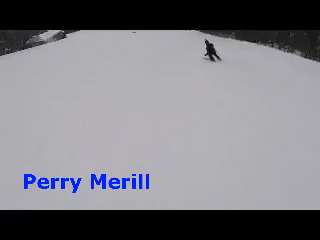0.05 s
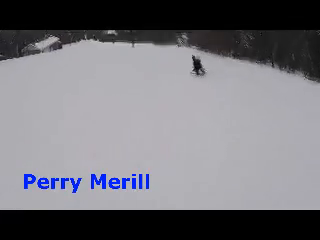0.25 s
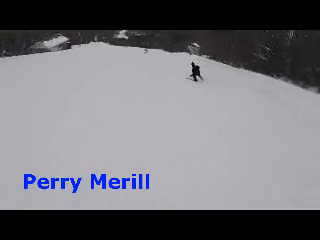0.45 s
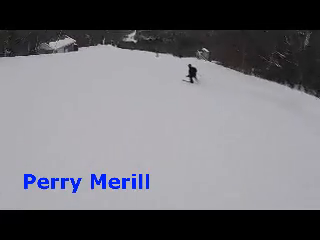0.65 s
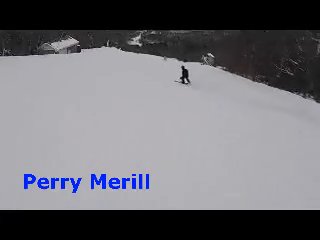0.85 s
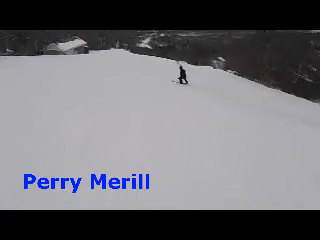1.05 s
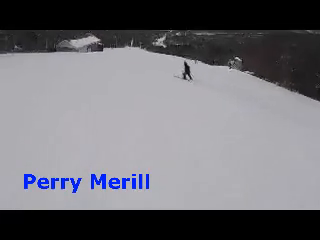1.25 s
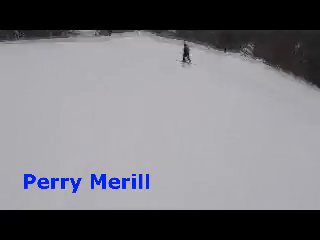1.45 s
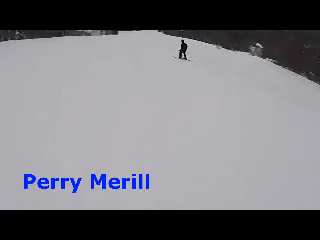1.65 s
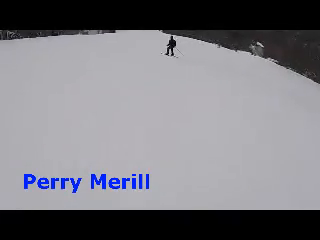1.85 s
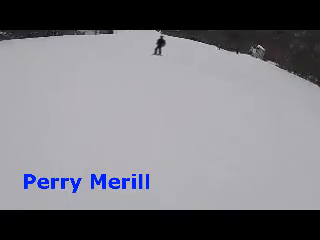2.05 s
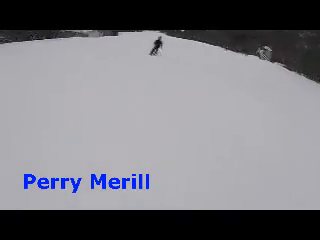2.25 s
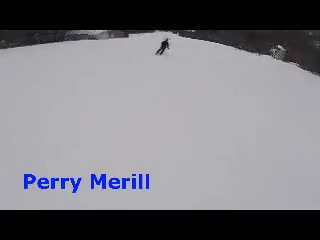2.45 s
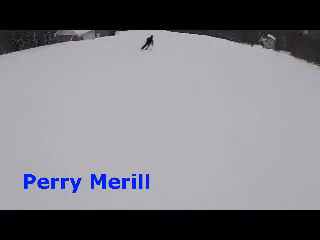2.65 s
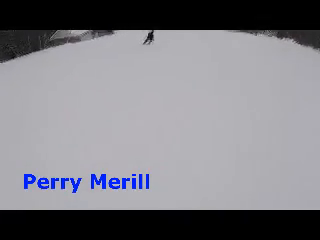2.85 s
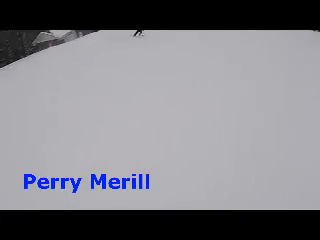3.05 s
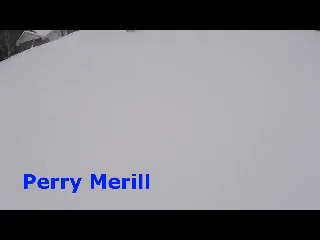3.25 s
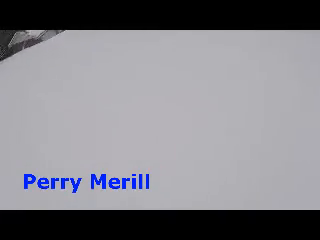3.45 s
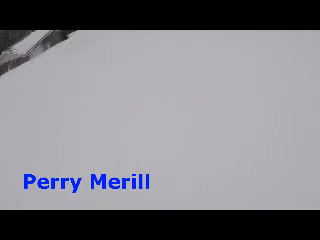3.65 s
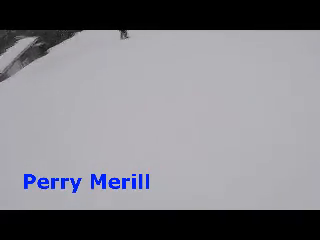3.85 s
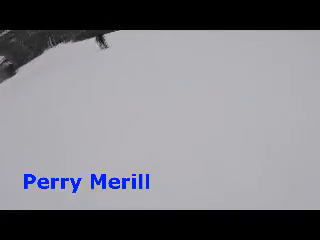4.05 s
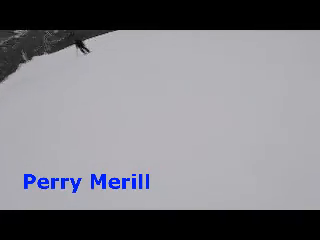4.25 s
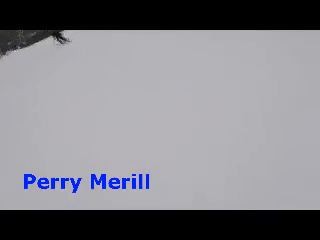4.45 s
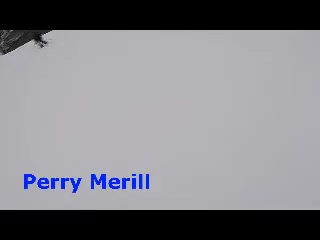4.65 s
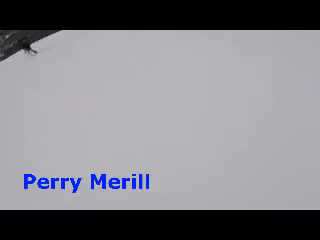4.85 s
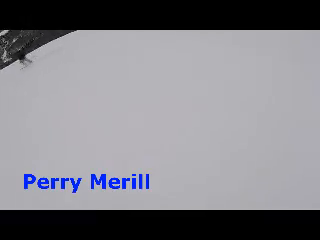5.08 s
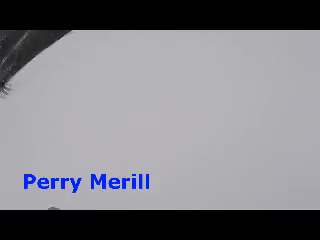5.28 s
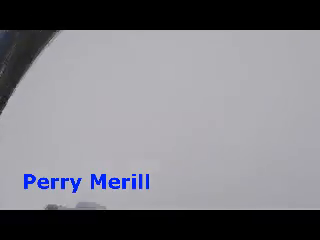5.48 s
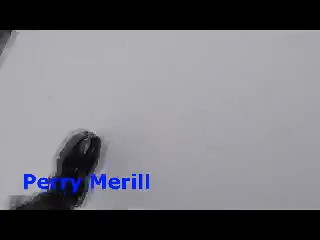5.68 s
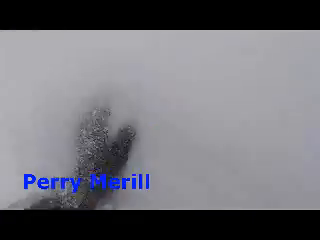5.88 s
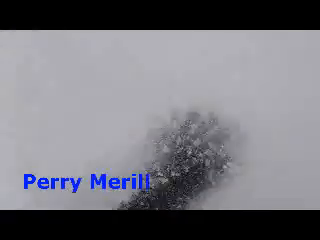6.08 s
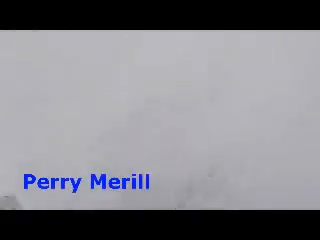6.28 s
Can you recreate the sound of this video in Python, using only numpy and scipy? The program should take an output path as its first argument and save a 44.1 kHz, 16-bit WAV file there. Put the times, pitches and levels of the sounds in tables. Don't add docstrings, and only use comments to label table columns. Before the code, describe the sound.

A skier glides on open snow, very close and muffled, mono. Deep wind buffeting dominates over a quiet hiss of ski bases and sparse knocks. Midway the scraping gets coarser and louder, with a dull thud and two harsh grinding skids. Then lumps of ice clatter hollowly against the housing, with gritty spray and deep thumps, harshly distorted before thinning out.

```python
import sys
import numpy as np
from scipy import signal
from scipy.io import wavfile
from scipy.ndimage import uniform_filter1d

SR = 44100
rng = np.random.default_rng(int(sys.argv[2]) if len(sys.argv) > 2 else 0)


def dump_mix(stems):
    frames = np.atleast_2d(stems).T
    limited = np.clip(frames, -1, 1)
    pcm = np.round(limited * 32767).astype(np.int16)
    wavfile.write(sys.argv[1], SR, pcm)


def undo_db(level):
    steps = np.asarray(level, float) / 20
    return 10 ** steps


N = 278712

# (t/s, main modes level/dB,
# centre of the blow/octaves above the main modes, loss/dB per squared octave from it, contact/ms)
PELLETS = [(5.732, -14.5, 0.28, 7, 1.2), (5.757, -19.5, 0.19, 9.4, 7.9), (5.781, -30, 0.39, 6, 5.8),
           (5.792, -18.5, .15, 24, 2.5), (5.803, -13, .15, 24, 2.2), (5.853, -25.5, -0.22, 15, 29),
           (5.872, -15.5, 0.071, 21, 3.1), (5.886, -19.5, 1.33, 2.9, 2), (5.895, -15, 0.26, 10, 2.2),
           (5.902, -18, 0.49, 14, 1.5), (5.923, -24, -0.0036, 13, 2.3), (5.936, -28, 0.92, 6.5, 4.4)]
LUMPS = [(5.947, -4, 0.55, 24, 3.7), (5.968, -7.5, 0.41, 1.4, 6.9), (5.981, -15, 1.75, 6.1, 0.43),
         (5.989, -9, .5, 2.1, 4.5), (5.9934, 6, 0.55, 7.1, 9.1), (6.008, -23, 0.53, 8.1, 2.3),
         (6.014, -24, 0.84, 15, 2.8), (6.0198, 3, 0.59, 8.4, 2.3), (6.026, 1.5, 0.24, 12, 1.8),
         (6.0327, 16.5, 0.41, 9.6, 8.4), (6.061, -11, 0.57, 7.7, 0.91), (6.063, -7.5, 0.96, 13, 1.6),
         (6.0683, -3.5, 0.4, 7.6, .7), (6.074, -4, 0.39, 9, 1.1)]
BOUNCES = [(6.0938, -18, 0.89, 4.5, 1.9), (6.0959, -3, 0.62, 4.2, 2), (6.1056, -11.5, 0.76, 7.3, 1.5),
           (6.1153, 4, 0.54, 12.3, 6.9), (6.129, -3, 0.16, 12, 2.9), (6.1341, -2, 1.23, 5.2, 3.1),
           (6.154, -20, 0.1, 12, 3.2), (6.181, -18, 0.1, 23, 4.6), (6.1903, -1, 0.74, 5.9, 3.6),
           (6.212, -6.5, 0.52, 16, 0.37), (6.2547, -21.5, 0.66, 29, 0.35), (6.2845, -14.5, 0.17, 23, 1.7)]

BITE_RISE_S, BITE_FALL_S = 0.033, 0.025
SPRAY_RISE_S, SPRAY_FALL_S = 0.04, 0.054
TURN_S = 0.098
SILENCE_DB = -100


def rms_one(x):
    return x / np.sqrt(np.mean(x ** 2) + 1e-20)


def in_time(rows):
    s, *columns = np.transpose(rows)
    return [np.interp(np.arange(N) / SR, s, c) for c in columns]


def swells(rows, rise_s, fall_s):
    t, out = np.arange(N) / SR, np.zeros(N)
    for s, hold_s, height in rows:
        crest = s + rise_s
        release = crest + max(hold_s, 0)
        out += height * np.interp(t, [s, crest, release, release + fall_s], [0, 1, 1, 0])
    return out


def drift(rate):
    r = np.exp(-64 * np.pi * rate / SR)
    noise = rng.standard_normal(N // 32 + 2001)
    return rms_one(signal.lfilter([1], [1, -2 * r, r * r], noise)[2000:])


def grit(per_s, spread_db):
    sizes = undo_db(spread_db * np.minimum(rng.exponential(1, N), 5)) * rng.standard_normal(N)
    clicks = rms_one(sizes * (rng.random(N) < per_s / SR))
    return clicks, clicks[::-1]


def banded(source, colour, shared_db, own_db, rate):
    points, together, out = np.array(colour), drift(rate), 0
    octaves = np.log2(points[-1, 0] / points[0, 0])
    edges = points[0, 0] * 2 ** np.arange(0, octaves + .2, 1 / 3)
    for k, (low, high) in enumerate(zip(edges, edges[1:])):
        level_db = np.interp(np.log(low * high) / 2, np.log(points[:, 0]), points[:, 1])
        sos = signal.butter(2, [low, high], "band", fs=SR, output="sos")
        band = signal.sosfilt(sos, source[k % 2])
        gain = undo_db(level_db + shared_db * together + own_db * drift(rate))
        out = out + np.repeat(gain, 32)[:N] * band
    return out


def low_pass(x, hz):
    return signal.sosfilt(signal.butter(6, hz, fs=SR, output="sos"), x)


def resonate(x, hz, t60):
    r, w = undo_db(-60 / (t60 * SR)), 2 * np.pi * hz / SR
    return signal.lfilter([1, 0, -1], [1, -2 * r * np.cos(w), r * r], x)


def housing(x):
    # (f/Hz, width/Hz, gain/dB)
    resonances = [(799, 64, 10), (1413, 310, 6), (3322, 98, -18), (3650, 71, -1), (4157, 193, -13.5),
                  (4310, 78, 8.5), (5130, 110, 5.5), (5770, 1610, -11.5), (6320, 740, 4.5), (7250, 360, -1),
                  (8270, 660, 2.5), (8850, 180, -1)]
    for hz, width, db in resonances:
        w, root = 2 * np.pi * hz / SR, undo_db(db / 2)
        a = np.pi * width / SR
        zeros = [1 + a * root, -2 * np.cos(w), 1 - a * root]
        poles = [1 + a / root, -2 * np.cos(w), 1 - a / root]
        x = signal.lfilter(zeros, poles, x)
    return rms_one(x)


def wind():
    # (t/s, level/dB)
    airstream = [(0, -39), (.8, -36.5), (1.0, -34.5), (1.45, -36), (1.7, -46), (2.1, -36.5), (2.5, -40.5),
                 (3.0, -41), (3.6, -44), (4.2, -36), (4.6, -45), (5.0, -40.5), (5.5, -34), (5.9, -35.5),
                 (6.05, -30.5), (6.32, -40)]
    # (crest t/s, buffeting gain/dB, slow push gain/dB)
    gusts = [(.1, -4, 9), (.44, 12, 14), (.63, 8.5, -9), (.77, -1, 9.5), (.93, 4.5, -15), (1.32, 4.5, -15),
             (1.43, 8.5, -10), (1.53, -11, 8.5), (1.64, 8.5, 7), (1.74, 1, -7), (1.92, 0, 3),
             (2.11, -4, 9.5), (2.22, 6.5, 3), (2.27, 7, 21), (2.46, 4.5, 6), (2.71, 5, 4), (2.78, -10, 5),
             (2.86, -2, 12), (3.22, 6, 3), (3.91, 1, 2), (3.96, -7, -8), (4.02, 2, 0), (4.15, 5, 5),
             (4.26, -8, 10.5), (4.4, 1, 12.5), (4.86, 13, -21), (5.38, 4.5, 9), (5.61, 3.5, 11),
             (5.93, 4.5, -9), (6.13, -18, 18.5), (6.23, -26, 12), (4.56, 8, -6), (4.72, 0.5, -10),
             (3.05, -9, 0)]
    # (f/Hz, density/dB per Hz)
    buffet = [(38, -10), (50, 6), (65, 2.5), (90, -4), (130, -20.5), (200, -51)]
    push = [(12, 7.5), (20, -3), (30, 10.5), (46, -3)]
    rise_s, fall_s = 0.055, 0.051
    stream_db, = in_time(airstream)
    buffet_db = stream_db + swells([(s - rise_s, 0, db) for s, db, _ in gusts], rise_s, fall_s)
    push_db = -42 + 0.12 * (stream_db + 40.0)
    push_db = push_db + swells([(s - rise_s, 0, db) for s, _, db in gusts], rise_s, fall_s)
    out = 0
    for gust_db, colour in ((buffet_db, buffet), (push_db, push)):
        noise = rng.standard_normal((2, N))
        air = rms_one(banded(noise, colour, shared_db=-2.5, own_db=2.5, rate=7.8))
        size = np.sqrt(uniform_filter1d(air ** 2, size=2600) + 0.037)
        out = out + undo_db(gust_db) * rms_one(air / size)
    return out


def vent():
    # (start/s, hold/s, gain/dB)
    headings = [
        (.4, 0.58, -17),
        (2.3, 0.63, 6.5),
        (5.0, 0.21, 5.5),
    ]
    # (f/Hz, density/dB per Hz)
    colour = [(4600, 6), (5800, -2.5), (6500, -5.5), (7400, -16), (8300, -12), (9200, -22)]
    level_db = -71 + swells(headings, TURN_S, TURN_S)
    hiss = banded(rng.standard_normal((2, N)), colour, shared_db=2.0, own_db=1.5, rate=5)
    return undo_db(level_db) * housing(low_pass(hiss, hz=8800))


def dust():
    # (start/s, hold/s, gain/dB over silence)
    drifts = [
        (5.22, 0.19, 43),
        (5.5, 0.21, 46),
        (5.82, .02, 47),
        (6.2, .1, 48.5),
    ]
    # (f/Hz, density/dB per Hz)
    powder = [(4200, 0.5), (5000, 2), (6500, -11), (8000, -9), (9000, -20)]
    level_db = SILENCE_DB + swells(drifts, SPRAY_RISE_S, SPRAY_FALL_S)
    return undo_db(level_db) * rms_one(banded(grit(6000, 2.0), powder, shared_db=1.0, own_db=1.5, rate=30))


def groan():
    # (start/s, hold/s, gain/dB over silence)
    groans = [
        (.3, 0.96, 44.5),
        (4.05, 0.079, 59.5),
        (5.23, 0.23, 65),
        (5.51, .01, 54),
        (5.63, 0.018, 67),
    ]
    hz, t60 = 308.5, 0.044
    mode = resonate(resonate(grit(2000, 2.3)[0], hz, t60), hz, t60)
    return undo_db(SILENCE_DB + swells(groans, BITE_RISE_S, BITE_FALL_S)) * rms_one(mode)


def skis():
    # (t/s, skid level/dB, hiss/dB against the skid)
    load = [(0, -55.5, 3.5), (.28, -51, 1.5), (.63, -48.5, 1.5), (1.05, -43.5, 1), (1.4, -51.5, -1.5),
            (1.83, -52.5, 2), (2.1, -46, -4), (2.4, -49.5, 1), (3.06, -49.5, 0), (3.25, -44.5, -8.5),
            (3.95, -43, -11.5), (4.3, -40, -10), (4.62, -37.5, -7), (5.05, -41.5, -10), (5.2, -41, -10),
            (5.78, -35.5, -8), (6.2, -31.5, -4.5), (6.32, -42, 2)]
    # (start/s, hold/s, gain/dB)
    bites = [(.31, 0.23, 4), (1.07, 0.056, 2.5), (1.2, .06, 3), (1.41, 0.0051, 5), (2.14, 0.088, 2.5),
             (2.46, 0.024, 0.5), (2.66, 0.0083, -1), (2.73, 0.009, 0), (2.9, 0.073, 3), (3.12, 0.012, 3.5),
             (3.45, 0.089, 4), (3.62, 0.17, -2.5), (4.03, 0.12, 2.5), (4.62, .14, 3.5), (5.215, 0.29, 8.5),
             (5.55, 0.0073, 0.5), (5.64, 0.0088, 3), (5.8, 0.0023, -10), (5.96, 0.028, 6),
             (6.15, .005, -1.5)]
    # (start/s, hold/s, gain/dB)
    catches = [
        (4.075, 0.12, 4.5),
        (4.27, 0.008, 4.5),
        (4.42, 0.045, 2),
        (4.655, 0.038, 2),
        (5.253, 0.008, 4),
        (5.33, 0.0093, 5.5),
        (5.4, 0.06, 4.5),
        (5.606, 0.073, 7),
    ]
    # (start/s, hold/s, gain/dB)
    bumps = [
        (2.16, 0.021, 5),
        (2.42, 0.2, 2.5),
        (2.72, 0.51, -3.5),
        (3.6, 0.28, 2),
        (4.62, 0.27, 4),
        (5.04, 0.044, 4),
        (5.26, 0.074, -2),
        (5.53, 0.028, -0.5),
        (5.97, 0.044, -4),
        (6.22, .1, -9),
    ]
    # (start/s, hold/s, gain/dB)
    swishes = [
        (.36, .14, 0),
        (.62, .2, -0.2),
        (1.0, 0.12, -0.5),
        (3.42, 0.083, 4.5),
    ]
    # (f/Hz, density/dB per Hz)
    skid_colour = [(350, -14.5), (600, -15), (980, -6.5), (1340, -1), (1960, -8), (2800, -8.5), (3620, -11),
                   (5140, -24), (6500, -29.5), (8400, -65)]
    drumming = [(70, -8), (120, 2), (200, -2.5), (320, -1.5), (480, -6.5), (800, -8), (1200, -16.5)]
    hiss_colour = [(1500, -29), (2200, -23.5), (2900, 13), (3600, 6.5), (4400, -41), (5200, -18.5),
                   (6500, -54), (8400, -60)]
    crust_colour = [(1400, -31), (1900, 0.5), (2400, 0.5), (3000, 8.5), (3600, -10)]

    load_db, loose_db = in_time(load)
    bite_db = swells(bites, BITE_RISE_S, BITE_FALL_S) + swells(catches, rise_s=0.0082, fall_s=0.045)
    skid_db = load_db + bite_db
    body_db = -49.0 + 0.59 * (skid_db + 49.5) + swells(bumps, BITE_RISE_S, BITE_FALL_S)
    hiss_db = skid_db + loose_db + 0.12 * bite_db + swells(swishes, TURN_S, TURN_S)
    spared_db = 3 * np.minimum(skid_db + 34, 0)
    crust_db = -32.5 + 2.1 * (np.minimum(skid_db, -29) + 30.0) + spared_db

    skid = housing(banded(grit(9000, 1.88), skid_colour, shared_db=-0.44, own_db=2.5, rate=19.0))
    body = rms_one(banded(grit(5000, 1.4), drumming, shared_db=0.84, own_db=0.5, rate=17))
    hiss = housing(banded(grit(14000, 2.8), hiss_colour, shared_db=0.26, own_db=1.5, rate=42))
    crust = housing(banded(grit(4000, 3.0), crust_colour, shared_db=1.5, own_db=1.2, rate=30))
    muffled = undo_db(skid_db) * skid + undo_db(hiss_db - 2.0) * hiss + undo_db(crust_db) * crust
    return low_pass(muffled, hz=7360) + undo_db(body_db + 2.0) * body


def knocks(rows, gain_db, uneven_db, hardness, side_db, snap, damping):
    # (f/Hz, level/dB, t60/s)
    main_modes = [(1348, -2, 0.034), (1395, -8.5, 0.029), (1516, -8.5, 0.011)]
    low_modes = [(593, -12, 0.014), (820, 4.5, 0.0055), (1090, 0, 0.014)]
    middle_modes = [(1987, -1.5, 0.012), (2268, -4, 0.014), (2582, -3, 0.011), (2850, -17, 0.0076)]
    high_modes = [(3715, 3, 0.021), (4280, -13.5, 0.02), (4620, -11, 0.018)]
    top_modes = [(5700, -32, 0.0063), (7630, -2, 0.0094), (9200, -7, 0.0067)]
    slushy_s = [5.757, 5.792, 5.803, 5.853, 5.871, 5.923, 5.946, 5.989, 6.008, 6.130, 6.153, 6.182, 6.2848]
    out, t_ms = np.zeros(N + 1536), np.arange(1536) * 1000 / SR
    for s, main_db, centre, focus_db, touch_ms in rows:
        noise = rng.standard_normal(len(t_ms))
        force = noise * np.exp(-(t_ms / max(touch_ms, .2)) ** 4) * np.minimum(t_ms / .3, 1)
        crisp = np.abs(s - np.array(slushy_s)).min() > .002
        force[0] = snap * np.sqrt(max(touch_ms, .2)) * crisp
        low_db, middle_db, high_db = (side_db + focus_db * (centre ** 2 - (octaves - centre) ** 2)
                                      for octaves in (-0.81, 1, 1.52))
        top_db = high_db + hardness * min(main_db + high_db, 0)
        groups = ((main_modes, 0), (low_modes, low_db), (middle_modes, middle_db),
                  (high_modes, high_db), (top_modes, top_db))
        at, luck = round(s * SR), iter(rng.normal(0, 1, 30))
        for modes, share_db in groups:
            for hz, db, t60 in modes:
                cushioned = resonate(force, hz, 3.5 / hz)
                ring = resonate(cushioned, hz, t60 * damping)
                gain = undo_db(main_db + gain_db + share_db + db + uneven_db * next(luck))
                out[at:at + len(t_ms)] += gain * ring / np.abs(ring).max()
    return out[:N]


def rings(rows, cycles, crunch):
    out, t_ms = np.zeros(N + 4096), np.arange(4096) * 1000 / SR
    for s, hz, db, touch_ms in rows:
        crunchy = 1 - crunch + crunch * rng.standard_normal(len(t_ms))
        force = crunchy * np.exp(-(t_ms / max(touch_ms, .2)) ** 4) * np.minimum(t_ms / .2, 1)
        ring = resonate(resonate(force, hz, 3.0 / hz), hz, cycles / hz)
        at = round(s * SR)
        out[at:at + len(t_ms)] += undo_db(db) * ring / np.abs(ring).max()
    return out[:N]


def ticks():
    # (t/s, main modes level/dB, centre/octaves, loss/dB per squared octave, contact/ms)
    taps = [(.0512, -36.5, 0.1, 9, 4.9), (.0827, -42, 0.29, 6, 1.8), (.3701, -31, 0.009, 9.5, 0.89),
            (1.446, -53, 1, 4, 1.8), (1.4995, -59, 0.79, 9, 1.5), (1.6147, -25.5, -0.0066, 24, 1.3),
            (1.6326, -40, -0.23, 13, 1.5), (2.1245, -42, 0.25, 2, 5.6), (2.4713, -40, -0.51, 5, 9.1),
            (2.516, -40, 0.42, 9, 2.6), (2.5318, -34, 0.43, 11, 1.9), (2.6495, -27.5, 0.13, 10, 1.4),
            (2.7287, -45, -0.33, 26, 1.6), (2.757, -43, -0.71, 8, 1.1), (2.831, -47, 0.61, 33, 3.8),
            (2.9204, -44, -0.51, 0, 0.63), (2.955, -34, 0.37, 7.5, 0.9), (3.1233, -35.5, 0.36, 9, 0.82),
            (3.1842, -33.5, 0.094, 13, 1.1), (3.266, -39, 0.0027, 23, 2.3), (3.365, -56, -1.44, 10, 1.1)]
    raw = knocks(taps, gain_db=0.0, uneven_db=0.5, hardness=.6, side_db=4.5, snap=11.3, damping=1.0)
    return low_pass(raw, hz=5260)


def thud():
    # (t/s, main modes level/dB, centre/octaves, loss/dB per squared octave, contact/ms)
    blow = [
        (5.0993, -32, 0.063, 7, 1.6),
    ]
    raw = knocks(blow, gain_db=3.5, uneven_db=5.5, hardness=.6, side_db=5.5, snap=6.5, damping=0.9)
    return low_pass(raw, hz=3400)


def mount_rings():
    # (t/s, f/Hz, level/dB, contact/ms)
    after_rings = [
        (5.0997, 1385, -16.5, 2.5),
        (5.0995, 700, -28.5, 0.87),
        (6.040, 1364, -1.5, 3.1),
        (6.3, 1200, -29, 4.1),
    ]
    return rings(after_rings, cycles=42, crunch=.3)


def body_blows():
    # (t/s, f/Hz, level/dB, contact/ms)
    blows = [(4.7, 430, -21.5, 2.4), (5.0995, 740, -16, 1.8), (5.0995, 2100, -22, 1.2),
             (1.615, 1900, -34, 1.3), (1.6155, 3900, -42, 1.6), (2.650, 2300, -38, 1.4),
             (2.650, 3800, -39, 1.4), (2.650, 900, -39, 1.4), (2.3, 520, -41, 1.4), (1.5, 900, -33, 0.8),
             (5.9, 1500, -25, 3.1), (5.2595, 2900, -22, 4.1), (3.08, 137, -35.5, 5.3), (3.2, 134, -34, 6.1)]
    return rings(blows, cycles=6.5, crunch=.3)


def heaves():
    # (t/s, f/Hz, level/dB, contact/ms)
    throws = [
        (5.588, 40.4, -20.5, 7.1),
        (5.94, 34.8, -26, 6.9),
        (5.99, 30, -28, 8),
        (6.016, 249, -33, 4.8),
        (6.034, 77, -16, 3.1),
        (6.06, 228, -17, 3.9),
        (6.112, 91, -16.5, 3.7),
        (6.13, 428, -23, 4.6),
        (6.187, 233, -22.5, 6.6),
        (6.25, 44.4, -28.5, 8),
    ]
    return rings(throws, cycles=1.5, crunch=0)


def mist():
    # (start/s, hold/s, gain/dB over silence)
    clouds = [
        (5.91, .26, 59),
        (5.97, .06, 4),
    ]
    # (f/Hz, density/dB per Hz)
    colour = [(9200, -6), (11000, -10), (12000, 1), (14700, 5)]
    level_db = SILENCE_DB + swells(clouds, SPRAY_RISE_S, SPRAY_FALL_S)
    return undo_db(level_db) * rms_one(banded(grit(8000, 1.5), colour, shared_db=2.0, own_db=4.5, rate=40))


def spray():
    # (start/s, hold/s, gain/dB over silence)
    throws = [
        (5.84, 0.037, 46.5),
        (5.94, 0.1957, 62),
        (6.11, .005, -3),
        (6.17, 0.03, 40.5),
    ]
    # (f/Hz, density/dB per Hz)
    colour = [(2500, -28), (4000, 3), (6000, -1.5), (8500, 0), (11000, -5.5), (13000, -14)]
    s, main_db, centre = np.transpose(PELLETS + LUMPS + BOUNCES)[:3]
    bursts = np.full(N, 1e-18)
    bursts[(s * SR).astype(int)] = undo_db(-35 + 2.0 * np.minimum(main_db, 0) + 10.0 * centre)
    decay_s = 0.0091
    shatter = signal.lfilter([1], [1, -np.exp(-1 / (decay_s * SR))], bursts)
    thrown = undo_db(SILENCE_DB + 4.5 + swells(throws, SPRAY_RISE_S, SPRAY_FALL_S))
    grains = rms_one(banded(grit(5600, 0.75), colour, shared_db=1.0, own_db=4.0, rate=74))
    return (thrown + shatter) * grains


def jolts():
    # (f/Hz, level/dB against the blow, t60/s)
    mount_modes = [(95, -24, .07), (300, -32, .04), (480, -29, .025)]
    s, main_db = np.transpose(LUMPS + BOUNCES)[:2]
    shoves = np.full(N, 1e-18)
    shoves[(s * SR).astype(int)] = undo_db(np.minimum(main_db, 4.0))
    soft = low_pass(shoves, hz=900)
    return sum(undo_db(db) * np.pi * hz / SR * resonate(soft, hz, t60) for hz, db, t60 in mount_modes)


def accents():
    # (t/s, f/Hz, level/dB, contact/ms)
    landings = [(1.446, 5300, -46, 1.4), (1.615, 3100, -31, 1.9), (1.615, 5100, -42, 1.8),
                (2.603, 2700, -45, 1.5), (5.887, 4980, -12, 1.6), (5.887, 8200, -23, 1.6),
                (5.887, 6500, -26, 1.3), (5.783, 3780, -30, 4), (6.0205, 13000, -33, 2),
                (2.6505, 5300, -46, 1.4), (2.729, 1760, -34, 2), (2.758, 2480, -39, 1.8),
                (5.259, 567, -27, 2.1), (5.615, 990, -21.5, 5), (5.676, 1470, -38, 4.2),
                (5.732, 5270, -38, 2), (5.968, 4450, -1, 6.5), (5.969, 820, -9, 3.8),
                (5.982, 4600, -14, 4.6), (5.994, 3830, 6.5, 4.7), (5.993, 815, -20, 3.1),
                (6.026, 4620, -3, 3.6), (6.035, 3800, 3, 4.5), (6.034, 580, -28, 3.7),
                (6.068, 3900, -14, 2.3), (6.075, 5500, -22, 0.87), (6.1155, 3780, -3, 4),
                (6.1335, 3760, 1, 4), (6.114, 650, -13, 3.7), (6.1155, 2500, -6, 6.8),
                (6.150, 734, -28, 6.7), (6.170, 3850, -28, 2), (6.190, 4560, -8, 4.7),
                (6.190, 7800, -25, 2), (6.212, 4100, -18, 0.9), (6.255, 3030, -18, 1.5),
                (6.286, 3000, -22, 1.1), (6.010, 1720, -13, 2.3), (6.0135, 1920, -9, 1.5),
                (6.0635, 2240, -3, 1.8), (6.0975, 1860, -2, 1.8), (6.255, 1910, -11, 0.95),
                (6.2123, 2330, -12, 0.47), (6.0198, 1840, -3, 1.9)]
    return rings(landings, cycles=26, crunch=0.58)


def lumps():
    raw = knocks(PELLETS + LUMPS + BOUNCES, gain_db=-2.0, uneven_db=3.0, hardness=0.54, side_db=-1.0,
                 snap=5.9, damping=0.58)
    return low_pass(raw, hz=7700)


def scene():
    mix = wind() + vent() + skis() + spray()
    mix = mix + ticks() + thud() + lumps() + jolts()
    mix = mix + groan() + dust() + heaves() + accents()
    mix = mix + mount_rings() + body_blows() + mist()
    return mix[None, :]


def thin_treble(x, from_hz, keep_db, loud_db):
    hz, _, z = signal.stft(x, SR, nperseg=2048)
    power = np.abs(z) ** 2
    patch = uniform_filter1d(uniform_filter1d(power, size=4, axis=0), size=6, axis=1)
    around = uniform_filter1d(uniform_filter1d(power, size=36, axis=0), size=6, axis=1)
    loud = uniform_filter1d(power.sum(axis=0), size=3) > undo_db(2 * loud_db)
    kept = (hz[:, None] < from_hz) | loud | (patch > around * undo_db(2 * keep_db))
    return signal.istft(z * kept, SR, nperseg=2048)[1][:N]


def roll_off(x):
    return signal.sosfilt(signal.butter(12, 12730, fs=SR, output="sos"), x)


def record(dry):
    top = .8
    clipped = dry / (1 + np.abs(dry / top) ** 6) ** (1 / 6)
    cut = signal.sosfilt(signal.cheby2(8, 40, 12800, fs=SR, output="sos"), clipped)
    cut = signal.sosfilt(signal.butter(2, 10500, fs=SR, output="sos"), cut)
    thinned = thin_treble(cut[0], from_hz=5000, keep_db=-.3, loud_db=-22)
    thinned = thin_treble(thinned, from_hz=8800, keep_db=4.0, loud_db=-20.0)
    thinned = thin_treble(thinned, from_hz=10000, keep_db=-1.0, loud_db=-9.0)
    mix = np.clip(thinned[None, :], -.91, .91)
    return roll_off(mix)


dry = scene()
out = record(dry)
dump_mix(out)
```